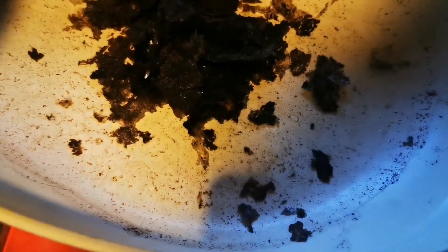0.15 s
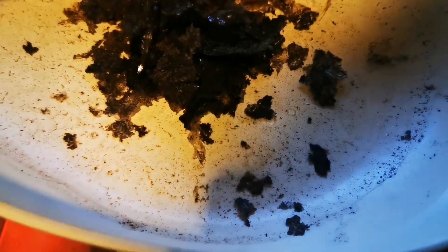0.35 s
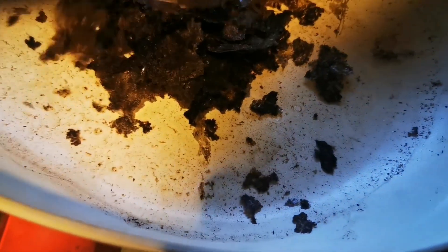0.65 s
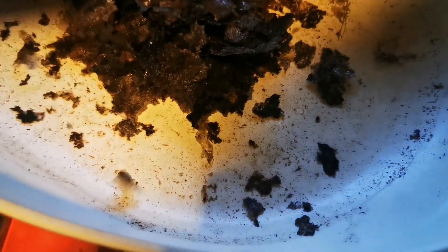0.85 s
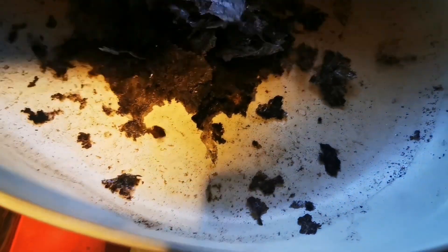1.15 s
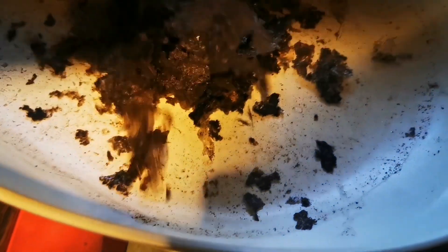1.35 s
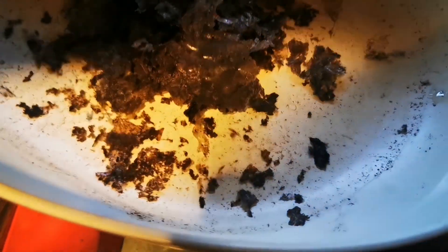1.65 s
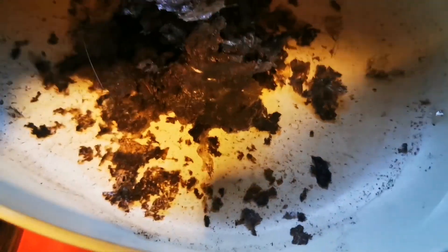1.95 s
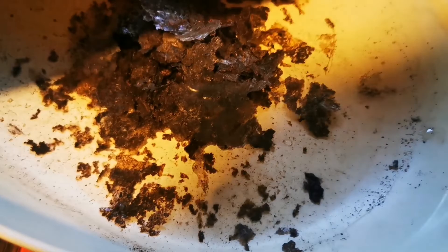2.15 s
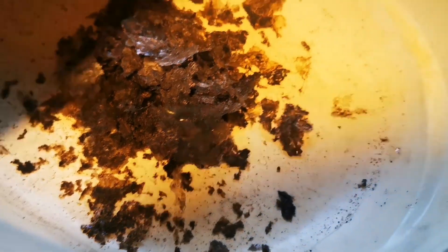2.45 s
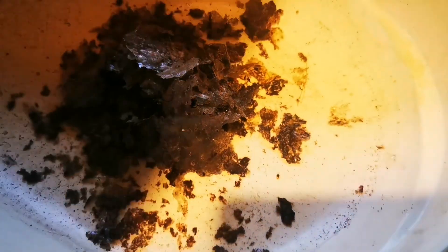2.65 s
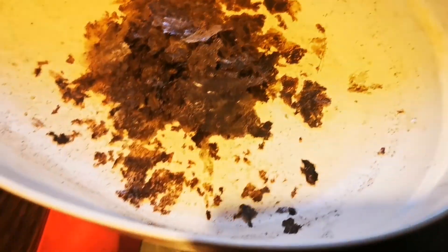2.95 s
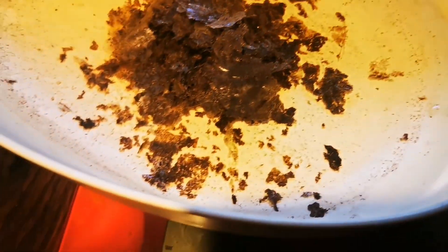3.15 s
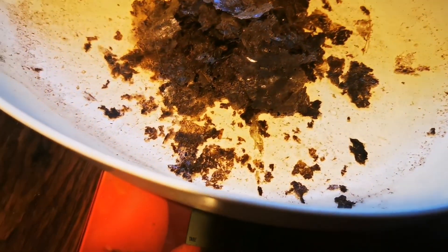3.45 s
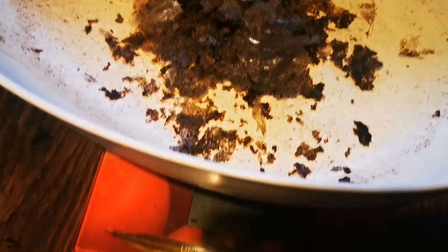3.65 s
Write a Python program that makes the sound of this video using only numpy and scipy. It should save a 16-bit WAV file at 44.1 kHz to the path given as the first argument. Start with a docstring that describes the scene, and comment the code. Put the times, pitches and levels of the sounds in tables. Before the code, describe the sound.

Dry flakes rustle and crackle as they are scraped in a bowl, in uneven bursts with small snaps, fading by 2 seconds. Soft table bumps and low microphone rumble join from about 1 to 2 seconds. In the lull, fingers brush the microphone near 2.3 and 3 seconds. At 3.6 seconds a loud, sharp knock on wood echoes briefly, and a duller one follows with a faint sliding hiss.

```python
"""Dry flakes in a bowl

Dry flakes are scraped about in a bowl on a table, close to a hand-held microphone in a small room.
Countless tiny fractures make the rustle, single flakes snap, and soft bumps ring the table.
The microphone rumbles and fingers rub it. Near the end a sharp knock on wood fills the room,
and a softer one follows, with a faint sliding hiss."""
import sys
import numpy as np
from scipy import signal
from scipy.fft import rfft, irfft, next_fast_len
from scipy.io import wavfile

SR = 44100
rng = np.random.default_rng(int(sys.argv[2]) if len(sys.argv) > 2 else 0)


def wrap_up_sound(samples):
    """Save the sound to the file named by the first command line argument, as 16-bit audio."""
    columns = np.atleast_2d(samples).T
    # keep every value between -1 and 1, then stretch to whole-number steps
    tamed = np.clip(columns, -1, 1)
    steps = np.round(tamed * 32767).astype(np.int16)
    wavfile.write(sys.argv[1], SR, steps)


N = 167580

# how hard the flakes are scraped (time [s], level [dB])
SCRAPE_EFFORT = [(0, -52), (.06, -51), (.19, -57), (.29, -50.5), (.48, -47.5), (.533, -39), (.567, -45),
                 (.62, -40), (.634, -35), (.695, -47.5), (.755, -46.5), (.86, -57.5), (.998, -59),
                 (1.015, -44), (1.04, -58.5), (1.085, -58), (1.11, -45), (1.26, -44.5), (1.32, -52.5),
                 (1.355, -41), (1.51, -53.5), (1.56, -50), (1.67, -68), (1.74, -62.5), (1.79, -82),
                 (1.845, -50.5), (1.89, -68), (2.15, -100)]
# the coarse crunch against the fine rustle (time [s], level [dB])
CRUNCH_SHARE = [(0, -10), (.95, -23), (1.25, -9.5), (1.5, -12)]
# tone of the fine and the coarse fractures (frequency [Hz], level [dB])
FINE_COLOUR = [(800, -39), (2200, -6), (3600, -5), (5700, 1.5), (7400, -7.5), (9400, -11.5), (10900, -2),
               (16000, -8)]
CRUNCH_COLOUR = [(100, -33), (450, 3), (900, -3), (1400, 3.5), (1750, -2.5), (4000, -5.5), (8000, -33)]
# microphone rumble (time [s], level [dB])
RUMBLE_LEVEL = [(0, -55), (1.05, -49.5), (1.3, -38), (1.72, -44.5), (1.78, -49), (1.87, -42), (2.25, -62.5),
                (3.5, -80.5), (3.8, -71)]
# tone of the rumble and of the background hiss (frequency [Hz], level [dB])
MIC_COLOUR = [(8, -19), (22, 2.5), (55, -17), (80, -9), (110, -23), (2000, -64.5)]
HISS_COLOUR = [(40, 4), (220, -9.5), (1300, -21.5), (2000, -16), (3100, -23.5), (4200, -20.5),
               (8000, -33.5), (11000, -29.5)]
# snapping flakes (time [s], level [dB], pitch [Hz], treble tilt [dB per octave])
FLAKE_SNAPS = [(0.116, -38, 5800, -4), (.217, -41.5, 5770, 1.5), (0.5016, -31, 1500, -10),
               (.69, -39.5, 2240, -4), (0.822, -39, 1697, -6.5), (1.013, -34.5, 4000, -0.5),
               (1.055, -38.5, 5100, 6), (1.095, -38.5, 4600, -6), (1.163, -35, 11300, 17),
               (1.1835, -35.5, 4500, -7.5), (1.29, -28, 3430, 5), (1.362, -28.5, 2640, -6.5),
               (1.537, -29.5, 4150, 23), (1.548, -42, 4140, -4), (1.585, -39, 4540, -3.5),
               (1.7091, -39, 4140, -0.5), (1.8117, -45, 5300, 3.5), (1.9078, -47.5, 6050, 1),
               (2.019, -53, 4370, 3.5), (2.629, -52.5, 970, -7)]
# bumps on the table (time [s], level [dB], treble cut-off [Hz])
TABLE_BUMPS = [(0.501, -56.5, 920), (1.134, -37.5, 224), (1.179, -38.5, 704), (1.222, -40, 230),
               (1.262, -38, 230), (1.607, -46.5, 674), (1.83, -44.5, 1200), (1.853, -50.5, 910),
               (1.949, -59, 816)]
# ringing tones of table and bowl (frequency [Hz], level [dB], time to fade 60 dB [s])
TABLE_MODES = [(82, -3.5, 0.25), (183.6, -6, 0.28), (229.1, -1.5, 0.43), (398.5, -6.5, 0.22),
               (568, -2.5, 0.14), (761, -14.5, 0.16), (1044, -0.5, 0.071), (1237, -1.5, .13)]
# tone of a bump's thud (frequency [Hz], level [dB])
THUD_COLOUR = [(40, 1), (140, -9.5), (600, -17.5), (1300, -11), (3000, -43)]
# how sound through the table leans to one side (frequency [Hz], left minus right [dB])
TABLE_BALANCE = [(200, 8.5), (900, 1), (4500, -13)]
# finger rubs (time [s], level [dB], length [s])
FINGER_RUBS = [(2.31, -46.5, 0.062), (2.9574, -42.5, 0.0054), (2.9678, -36, 0.0062), (2.992, -45, 0.0099)]
# tone of rubbing skin (frequency [Hz], level [dB])
SKIN_COLOUR = [(260, 4), (500, -10), (2300, -23.5), (6000, -42)]
# knocks on wood (time [s], level [dB], treble cut-off [Hz])
WOOD_KNOCKS = [(3.565, -17.5, 4330), (3.7543, -19.5, 430)]
# ringing tones of the wood in the room (frequency [Hz], level [dB], time to fade 60 dB [s])
WOOD_MODES = [(131.2, -19.5, 0.95), (182.6, -15.5, 0.28), (234.7, -15.5, 0.39), (381.5, -7.5, 0.41),
              (487.3, -16.5, 0.73), (565, -17, 0.65), (766, -7.5, 0.16), (929, -8, 0.18), (1055, -10, 0.19),
              (1228, -11, 0.24), (1360, -16.5, 0.25)]
# tone of a knock's blow and of the room's echo (frequency [Hz], level [dB])
BLOW_COLOUR = [(50, -40), (850, 1), (1300, -1.5), (1600, -18.5), (3500, -24.5), (4900, -20), (12000, -76)]
ECHO_COLOUR = [(40, -34), (110, -5), (1220, -5), (1600, -17), (12000, -56)]
# sliding hiss (time [s], level [dB])
SLIDE_LEVEL = [(3.55, -100), (3.58, -63.5), (3.745, -54.5), (3.757, -41.5), (3.785, -53.5)]
# tone of that hiss (frequency [Hz], level [dB])
SLIDING_COLOUR = [(1200, 4.5), (4800, -1), (10000, -19)]

RUSTLE_PAN_DB = -5.5  # left minus right
ALIKE_HZ = 740  # bumps and knocks differ between left and right above this


def undb(db):
    """Turn decibels into a gain."""
    return 10 ** (np.asarray(db) / 20)


def unit(x):
    """Scale to an average (rms) level of 1."""
    return x / np.sqrt(np.mean(x ** 2, axis=-1, keepdims=True))


def curve(rows):
    """Gain through time from (time [s], level [dB]) points."""
    return undb(np.interp(np.arange(N) / SR, *np.array(rows).T))


def db_at(rows, hz):
    """Look up the level at a frequency."""
    f, db = np.array(rows).T
    return np.interp(np.log(hz + 1e-9), np.log(f), db)


def pan(db):
    """Left and right gains; positive leans left."""
    return undb(np.array([[db], [-db]]) / 2)


def tint(x, gain):
    """Filter by gain(frequency), then scale to level 1."""
    size = next_fast_len(x.shape[-1])
    spectrum = rfft(x, size) * gain(np.arange(size // 2 + 1) * SR / size)
    return unit(irfft(spectrum, size)[..., :x.shape[-1]])


def noise(colour, size=N):
    """Coloured noise, unrelated left and right."""
    return tint(rng.standard_normal((2, size)), lambda f: undb(db_at(colour, f)))


def diffuse(colour, size):
    """Coloured noise that leans as the table does; alike on both sides in the bass only."""
    f = np.fft.rfftfreq(size, 1 / SR)
    phase = 2 * np.pi * rng.random(len(f))
    apart = rng.standard_normal(len(f)) * np.minimum(f / ALIKE_HZ, 2) / 2
    side = np.array([[1], [-1]])
    gain = undb(db_at(colour, f) + side * db_at(TABLE_BALANCE, f) / 2)
    x = irfft(gain * np.exp(1j * (phase + side * apart)), size)
    return x / x.std()


def fade(t, t60):
    """Die away by 60 dB every t60 seconds."""
    return np.exp(-np.log(1000) * t / t60)


def ring(modes, t):
    """A struck object's fading tones, slightly different at each blow."""
    out = 0
    for (hz, db, t60), (detune, apart) in zip(modes, rng.standard_normal((len(modes), 2))):
        lag = np.array([[0], [apart * hz / ALIKE_HZ]])
        tone = np.sin(2 * np.pi * hz * (1 + 0.0025 * detune) * t + lag)
        out = out + undb(db) * pan(db_at(TABLE_BALANCE, hz)) * fade(t, t60) * tone
    return out


def soften(x, hz):
    """A soft contact takes away the treble."""
    return signal.sosfilt(signal.butter(2, min(hz, SR / 3), fs=SR, output="sos"), x)


def add(out, start, x):
    """Mix x in at start seconds."""
    i = int(start * SR)
    out[:, i:i + x.shape[1]] += x[:, :N - i]


def fractures(colour, spots=6, clicks_per_s=4500, spread_db=3.5, cluster_db=2.5, clusters_per_s=220):
    """Tiny breaks click unevenly, in clusters; each spot in the bowl scatters them its own way."""
    t = np.arange(SR // 50) / SR
    swings = cluster_db * rng.standard_normal(4096)
    clusters = undb(np.interp(np.arange(N) / SR * clusters_per_s, np.arange(len(swings)), swings))
    decay = np.exp(-t / 0.00065) + undb(-13.5) * np.exp(-t / 0.01)
    out = 0
    for _ in range(spots):
        breaks = rng.random(N) < clicks_per_s / spots / SR
        sizes = undb(spread_db * np.minimum(rng.exponential(size=N), 5))
        clicks = breaks * sizes * rng.choice([-1, 1], N) * clusters
        scatter = rng.standard_normal((2, len(t))) * decay
        out = out + signal.oaconvolve(clicks[None], scatter, axes=1)[:, :N]
    return tint(out, lambda f: undb(db_at(colour, f)))


def chips(per_s=200, pitch_hz=4910, spread_octaves=0.268, spread_db=3.5, ring_s=0.0029):
    """Small flakes chip off, each with a short ring of its own pitch."""
    out, t = np.zeros((2, N)), np.arange(SR // 50) / SR
    for when, size, lower, higher, left, right in rng.random((int(per_s * N / SR), 6)):
        hz = pitch_hz * 2 ** (2 * spread_octaves * (higher - lower))
        tone = np.sin(2 * np.pi * (hz * t + np.array([[left], [right]]))) * np.exp(-t / ring_s)
        add(out, when * N / SR, tone * undb(-spread_db * np.log(size + 0.0069)))
    return unit(out)


def rustle():
    """Fine fractures, ringing chips and coarse crunch grow louder with harder scraping."""
    fine = pan(RUSTLE_PAN_DB) * (fractures(FINE_COLOUR) + undb(-11.5) * chips())
    crunch = curve(CRUNCH_SHARE) * pan(4.5) * fractures(CRUNCH_COLOUR)
    return curve(SCRAPE_EFFORT) * (fine + crunch)


def rumble():
    """The hand-held microphone rumbles, mostly on the left."""
    left, separate = noise(MIC_COLOUR)
    right = undb(-14) * left + undb(-22.5) * separate
    return curve(RUMBLE_LEVEL) * np.array([left, right])


def background():
    """The quiet room and the microphone hiss steadily."""
    return undb(-66) * pan(-4) * noise(HISS_COLOUR)


def snaps(crack_s=0.0012, tail_s=0.015, width_octaves=0.058):
    """A larger flake breaks: a brief crack with its own ring and a faint tail."""
    out, t = np.zeros((2, N)), np.arange(SR // 10) / SR
    shape = (1 - np.exp(-t / 0.00027)) * (np.exp(-t / crack_s) + undb(-18) * np.exp(-t / tail_s))
    for start, db, hz, tilt_db in FLAKE_SNAPS:
        white = rng.standard_normal((2, 2, len(t)))
        crack = tint(white[0], lambda f: undb(db_at(FINE_COLOUR, f) + tilt_db * np.log2(f / hz + 0.24)))
        ringing = tint(white[1], lambda f: 1 / (1 + (np.log2(f / hz + 1e-6) / width_octaves / 2) ** 2))
        add(out, start, undb(db) * shape * (crack + undb(-4) * ringing))
    return out * pan(-7.5)


def bumps():
    """Soft blows thud and ring the table and the bowl on it."""
    out, t = np.zeros((2, N)), np.arange(SR * 2 // 3) / SR
    for start, db, hz in TABLE_BUMPS:
        ringing = ring(TABLE_MODES, t)
        thud = undb(1) * diffuse(THUD_COLOUR, len(t)) * fade(t, t60=0.29)
        add(out, start, undb(db) * soften(ringing + thud, hz))
    return out


def fingers(slip_hz=84, cutoff_cycles=25):
    """Skin sticks and slips on the microphone's right side; longer rubs are duller."""
    out, t = np.zeros((2, N)), np.arange(SR // 4) / SR
    slips = np.sin(np.pi * slip_hz * t) ** 2
    for start, db, length in FINGER_RUBS:
        swell = 2 * t / length * np.exp(1 - 2 * t / length)
        rub = noise(SKIN_COLOUR, len(t)) * slips * swell
        add(out, start, undb(db) * soften(rub, cutoff_cycles / length))
    return out * undb([[-20], [0]])


def knocks(flat_after_s=0.00267, bass_hz=520):
    """Wood lands on one edge, then flat; it rings and the room echoes, longest in the bass."""
    out, t = np.zeros((2, N)), np.arange(SR * 2 // 3) / SR
    build_up = 1 - np.exp(-t / 0.0029)
    for start, db, hz in WOOD_KNOCKS:
        edge, flat = (diffuse(BLOW_COLOUR, len(t)) * fade(t, t60=0.036) for _ in range(2))
        room = diffuse(ECHO_COLOUR, len(t))
        bass = signal.sosfiltfilt(signal.butter(2, bass_hz, fs=SR, output="sos"), room)
        echo = bass * fade(t, t60=0.76) + (room - bass) * fade(t, t60=0.33)
        tail = build_up * (undb(-6) * echo + ring(WOOD_MODES, t))
        add(out, start, undb(db) * soften(edge + tail, hz))
        add(out, start + flat_after_s, undb(db + 3) * soften(flat, hz / 2))
    return out


def slide():
    """A tick comes with the first knock, and a faint sliding hiss follows."""
    out, t = np.zeros((2, N)), np.arange(SR * 2 // 3) / SR
    tick = noise(SLIDING_COLOUR, len(t)) * fade(t, t60=0.01) * pan(RUSTLE_PAN_DB)
    add(out, WOOD_KNOCKS[0][0], undb(-40.5) * tick)
    return out + curve(SLIDE_LEVEL) * noise(SLIDING_COLOUR) * pan(-3)


def scene():
    """Mix the flakes, table, wood and microphone sounds."""
    return rustle() + snaps() + bumps() + knocks() + slide() + rumble() + fingers() + background()


def record(dry):
    """The recorder cuts the treble above 15750 Hz."""
    return signal.sosfilt(signal.ellip(10, .2, 80, 15750, fs=SR, output="sos"), dry)


dry = scene()
out = record(dry)
wrap_up_sound(out)
```